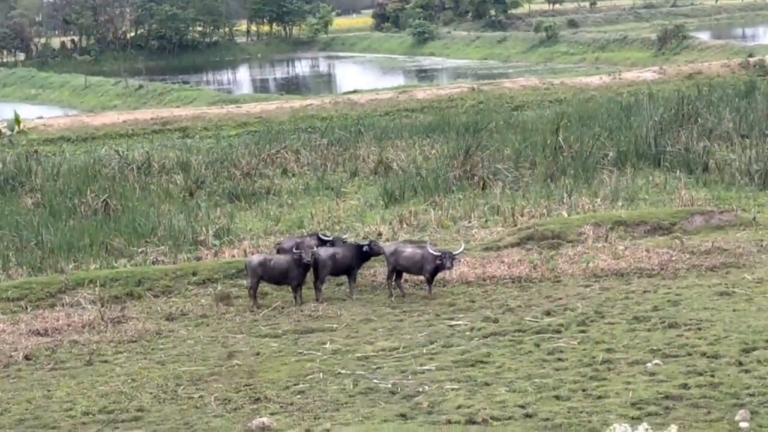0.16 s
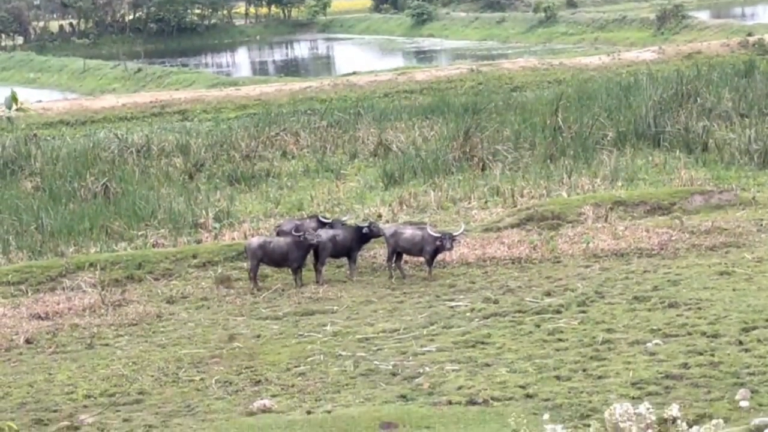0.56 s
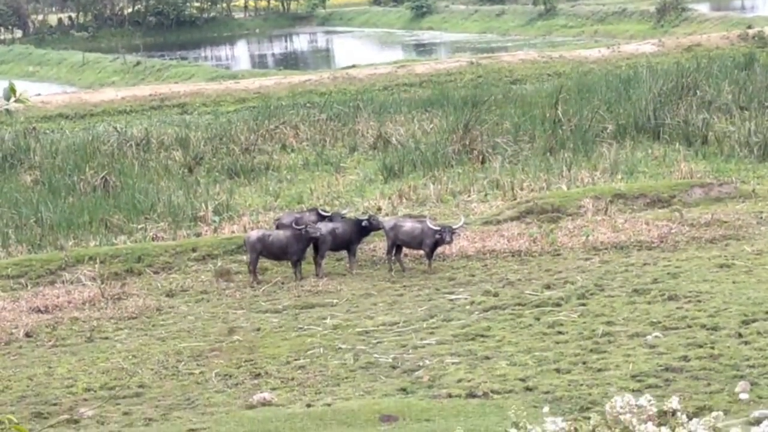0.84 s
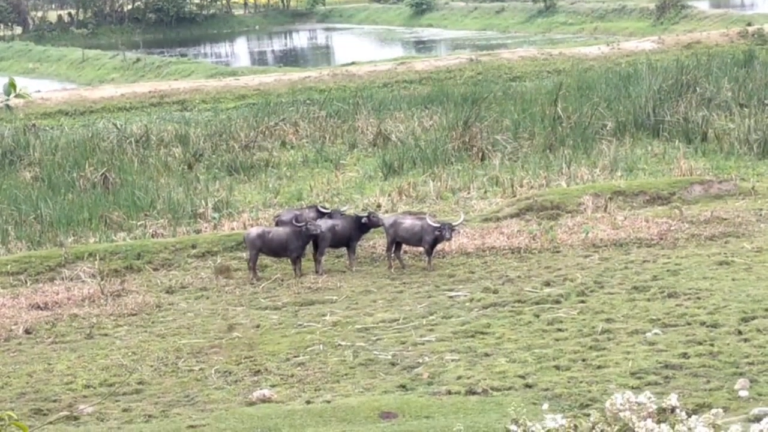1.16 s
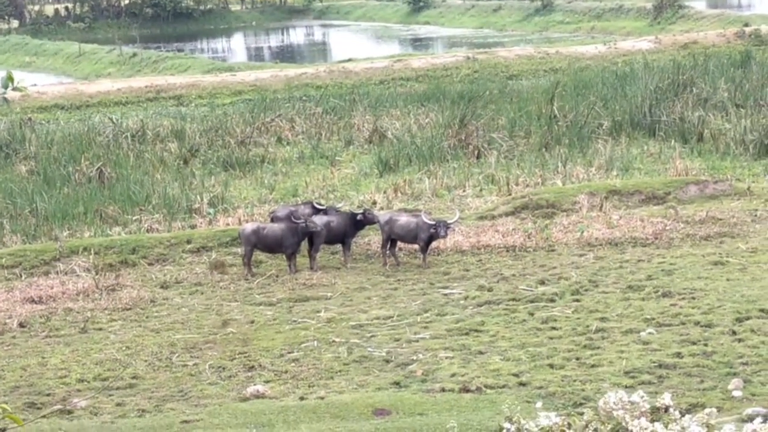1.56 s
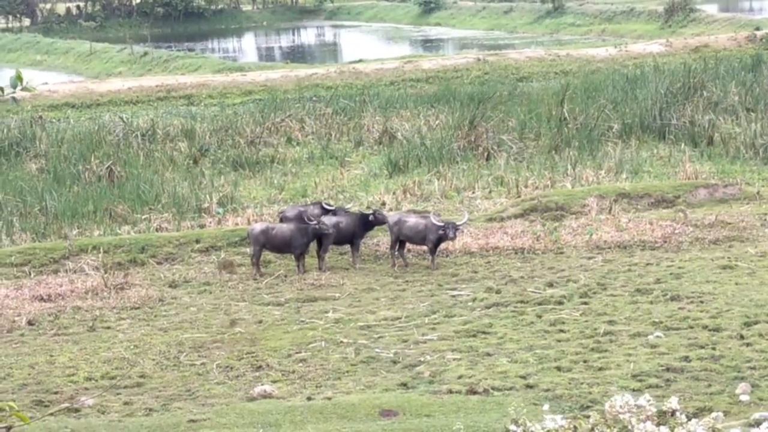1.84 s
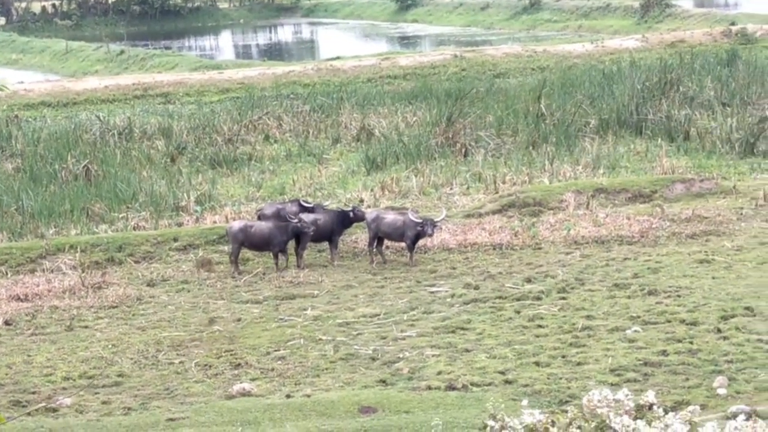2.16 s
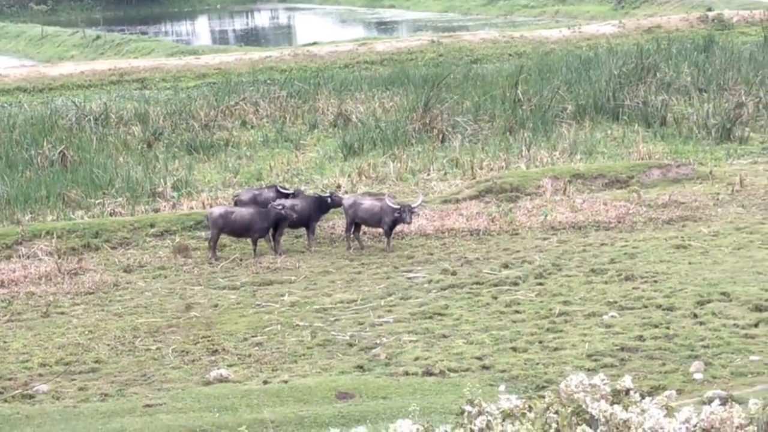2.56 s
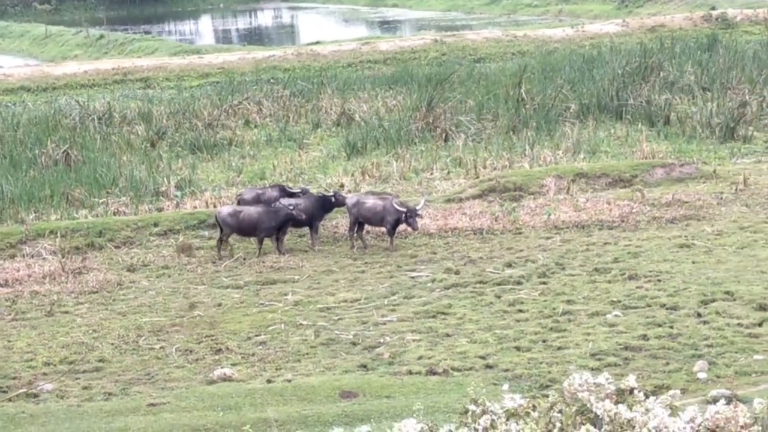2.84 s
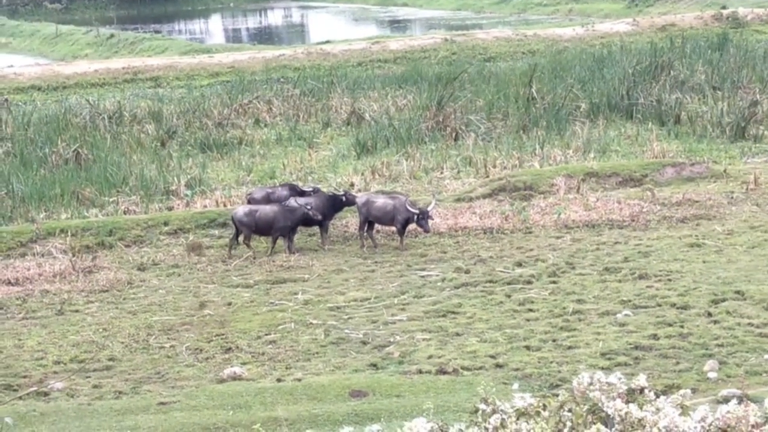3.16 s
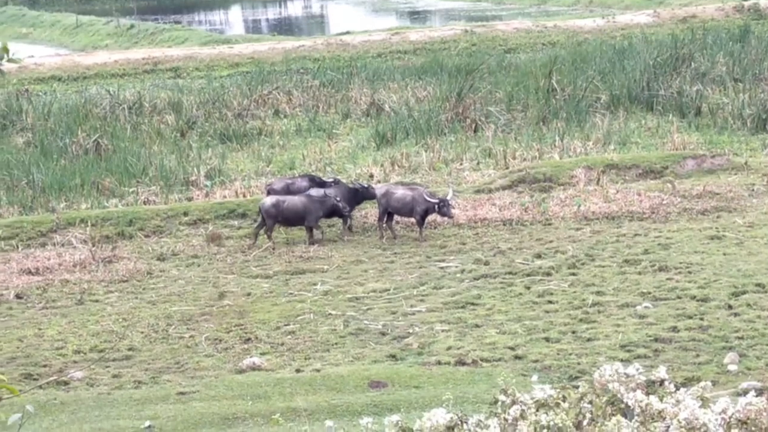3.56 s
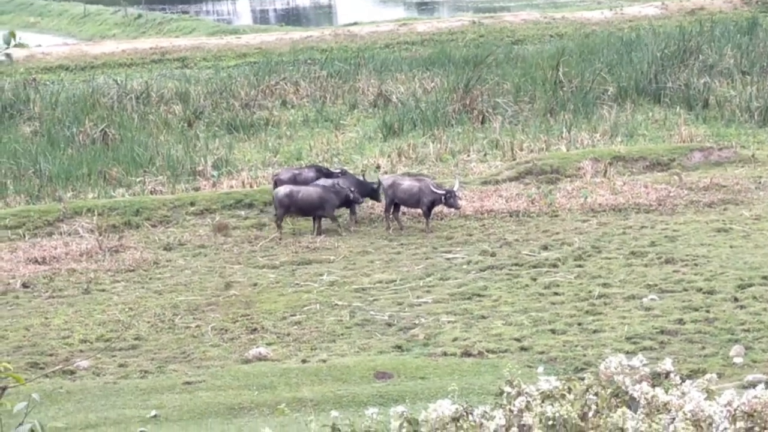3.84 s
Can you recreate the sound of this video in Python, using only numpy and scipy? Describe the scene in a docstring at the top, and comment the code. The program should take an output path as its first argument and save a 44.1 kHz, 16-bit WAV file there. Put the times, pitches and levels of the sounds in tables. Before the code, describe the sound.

One low, rasping buffalo bellow swells upward, drops to a steady softer tone and ends in a creak. Light wind rumbles on the microphone throughout, left with faint outdoor hiss once the call stops.

```python
"""Buffalo lowing in an open field

A buzzy train of vocal-fold pulses rings the throat: the call swells up in pitch, catches once,
holds a steady note and creaks out as the folds flap loosely. The field adds a short reverb.
Wind thumps softly on the microphone; faint ticks, a rustle, thin whistles and hiss lie behind."""
import sys
import numpy as np
from scipy import signal
from scipy.fft import rfft, irfft
from scipy.io import wavfile
from scipy.ndimage import uniform_filter1d

SR = 44100
rng = np.random.default_rng(int(sys.argv[2]) if len(sys.argv) > 2 else 0)


def wav_record(signal):
    """Record a signal, one row per channel, as 16-bit PCM in the file named by sys.argv[1]."""
    frames = np.transpose(np.atleast_2d(signal))
    bounded = np.clip(frames, -1, 1)
    # unit amplitude maps onto the largest positive 16-bit level
    quanta = np.round(bounded * 32767).astype(np.int16)
    wavfile.write(sys.argv[1], SR, quanta)


N = 176400
T = np.arange(N) / SR

# call contour: t/s, pulse rate/Hz, level/dB
CALL_CONTOUR = [(0.0, 68.3, -33), (0.014, 70.27, -38.5), (0.074, 71.68, -37.5), (0.164, 72.14, -38),
                (0.34, 75.4, -35.5), (0.448, 81.34, -32), (0.562, 90.2, -29.5), (0.662, 94.4, -26.5),
                (0.69, 91.9, -28), (0.756, 78.8, -30), (0.804, 73.3, -35), (0.832, 70.6, -38),
                (0.87, 68.72, -38.5), (1.04, 66.95, -43), (1.084, 68.07, -41), (1.67, 68.06, -43.5),
                (1.7, 68.7, -36.5)]
# unbroken pulse runs, the voice catches between them: start/s, end/s
PULSE_RUNS = [(0.0109, .79), (0.808, 1.68)]


def voice():
    """Each fold closure rings the throat; rasp and a rattle of the upper resonance follow it."""
    # gain of the lowest overtones: t/s, level/dB
    bass = [(0, 1), (.2, 1.5), (.45, 2.5), (.66, .5), (.76, 4.5), (.8, 5), (.86, -1), (1.68, 0)]
    # rattle relative to the call: t/s, level/dB
    rattle_levels = [(0, -9), (.2, -3.5), (.4, -8.5), (.66, -13.5), (.71, -0.5), (.85, 0.5), (1, -6),
                     (1.68, -0.5)]
    relaxed_hz, strained_hz, bass_top_hz = 66.6, 92.35, 240
    lead_s, jitter, shimmer_db = .005, .0025, .8
    rasp_db, rasp_s = -16, .005
    rattle_hz, rattle_lag_s, rattle_s = 1656, .0025, .00093
    out, age, hz = np.zeros(N), T[:4096], np.fft.rfftfreq(4096, 1 / SR)
    scatter, breath = iter(rng.standard_normal((200, 5))), rng.standard_normal(N)
    for t, end in PULSE_RUNS:
        while t < end:
            d_level, d_period, d_lag, d_pitch, d_rattle = next(scatter)
            rate_hz = curve(CALL_CONTOUR, t)
            strain = np.clip((rate_hz - relaxed_hz) / (strained_hz - relaxed_hz), 0, 1) ** .6
            db = throat_db(hz, strain, rate_hz / relaxed_hz, rate_hz / strained_hz)
            db += curve(bass, t) / (1 + (hz / bass_top_hz) ** 8)
            pulse = -fold_pulse(db, delay_samples=lead_s * SR + (t - lead_s) * SR % 1)
            # strained folds close again mid-cycle
            half_cycle = int(.5 * SR / rate_hz)
            pulse += .45 * strain ** 2.7 * np.r_[np.zeros(half_cycle), pulse[:-half_cycle]]
            puff = np.roll(breath, -int(t * SR))[:len(age)] * np.exp(-age / rasp_s)
            pulse += undb(rasp_db) * signal.fftconvolve(pulse, puff)[:len(age)] / np.sqrt(rasp_s * SR)
            pulse *= np.sqrt(SR / rate_hz / np.sum(pulse ** 2))  # unit power per cycle
            rattle_age = np.maximum(age - lead_s - rattle_lag_s * (1 + .04 * d_lag), 0)
            rattle = np.sin(2 * np.pi * rattle_hz * (1 + .015 * d_pitch) * rattle_age)
            rattle *= bump(rattle_age, 2 * rattle_s) ** 2
            pulse += rattle * undb(curve(rattle_levels, t) + 2 * d_rattle)
            add(out, t - lead_s, pulse * undb(curve(CALL_CONTOUR, t, column=2) + shimmer_db * d_level))
            t += (1 + jitter * d_period) / curve(CALL_CONTOUR, t + .5 / rate_hz)
    return out


def throat_db(hz, strain, relaxed_pitch_ratio, strained_pitch_ratio):
    """Throat colour: blends from relaxed to strained and slides up with pitch."""
    # throat spectra: f/Hz, relative level/dB
    relaxed = [(40, -30.5), (68, -16), (136, -9), (204, -7.5), (272, 0.5), (340, -9), (408, -22.5),
               (476, -12), (545, -19), (612, 1), (680, -9.5), (750, -1.5), (820, -10.5), (990, -16),
               (1160, -10), (1400, -7.5), (1490, -19.5), (1570, -6), (1700, -5.5), (1850, -14),
               (2150, -16.5), (2300, -30.5), (2450, -42.5), (3500, -55.5), (5000, -75.5)]
    strained = [(40, -32), (93, -10), (186, -6), (279, 4.5), (372, -3.5), (465, -13.5), (558, -7),
                (650, -4.5), (742, -4), (850, -12.5), (1020, -14), (1300, -8), (1480, -4.5), (1640, -16.5),
                (1800, -6.5), (1950, -16), (2250, -29), (2550, -41.5), (3000, -52), (3350, -46.5),
                (3800, -60), (5000, -77)]
    pitch_follow = .49
    return ((1 - strain) * colour_db(relaxed, hz / relaxed_pitch_ratio ** pitch_follow)
            + strain * colour_db(strained, hz / strained_pitch_ratio ** pitch_follow))


def fold_pulse(db, delay_samples, size=4096, opening_hz=850):
    """One pulse of spectrum db: the slow fold opening leads the closure, the throat rings after it."""
    hz = np.fft.rfftfreq(size, 1 / SR)
    cepstrum = irfft(db * np.log(10) / 20, size)
    causal = np.r_[cepstrum[0], 2 * cepstrum[1:size // 2], np.zeros(size // 2)]  # minimum phase
    phase = 2 * np.arctan(hz / opening_hz) - 2 * np.pi * hz * delay_samples / SR
    return irfft(np.exp(rfft(causal) + 1j * phase), size)


def creaks(rise_s=.0015, lower_hz=693):
    """Loose fold flaps ring the upper and lower throat resonances."""
    # flaps: t/s, level/dB, upper f/Hz, lower ring relative level/dB
    flaps = [(0.7978, -35, 1600, -8), (1.6884, -46, 1630, 4), (1.7178, -54.5, 1815, 3),
             (1.733, -60, 1590, -17), (1.7569, -56, 1690, -18), (1.7974, -60, 1474, -17)]
    out, age = np.zeros(N), T[:2000]
    envelope = bump(age, rise_s)
    for t, db, upper_hz, lower_db in flaps:
        upper = envelope ** 2 * np.sin(2 * np.pi * upper_hz * age)
        lower = envelope * np.sin(2 * np.pi * lower_hz * age)
        add(out, t, undb(db) * (upper + undb(lower_db) * lower))
    return out


def airy_hiss(follow=.51, fade_s=.3):
    """Faint hiss that rises and falls with the call, then fades."""
    # spectrum at the call's peak: f/Hz, density/(dB per Hz)
    air_spectrum = [(1500, -125), (2600, -108), (3500, -112), (5000, -118), (7500, -120), (8600, -116),
                    (9600, -120), (11000, -108), (12500, -117), (15000, -117)]
    call_db = curve(CALL_CONTOUR, T, column=2) - np.max(np.array(CALL_CONTOUR)[:, 2])
    gain = undb(follow * call_db + 1.1 * walk(30))
    fade = np.clip((PULSE_RUNS[-1][1] + fade_s - T) / fade_s, 0, 1)
    return noise(air_spectrum) * gain * fade


def field_reverb(call, level_db=-14, t60_s=.24):
    """The field returns the call as a short diffuse tail."""
    age = T[:SR // 2]
    tail = rng.standard_normal(len(age)) * undb(-60 * age / t60_s)
    return undb(level_db) * signal.fftconvolve(call, tail / np.sqrt(np.sum(tail ** 2)))[:N]


def wind(gust_db=2.5, skew=.17):
    """Wind on the microphone: low rumble in uneven, slightly one-sided puffs."""
    # rumble spectrum: f/Hz, relative level/dB
    rumble_spectrum = [(15, -9), (25, 5.5), (80, -4.5), (124, -12), (189, -24), (270, -32), (400, -62),
                       (900, -110)]
    # wind strength: t/s, level/dB
    wind_levels = [(0, -38), (.2, -50), (.8, -55), (1.1, -52), (1.7, -53), (2.1, -57.5), (2.45, -57),
                   (2.62, -49.5), (2.76, -50.5), (2.93, -56.5), (3.03, -46), (3.18, -54), (3.28, -47),
                   (3.5, -58), (3.65, -52), (3.74, -48.5), (3.88, -45), (4, -51.5)]
    rumble = noise(rumble_spectrum) * undb(gust_db * walk(12))
    rumble /= np.sqrt(smooth(rumble ** 2, SR // 5))  # level out slow swings
    return (rumble + skew * (rumble ** 2 - 1)) * undb(curve(wind_levels, T))


def ticks(decay_s=.0015, top_hz=2500):
    """Dull ticks: brief noise bursts through a broad resonance."""
    # ticks: t/s, peak level/dB, centre f/Hz
    bursts = [(2.159, -62, 1604), (2.945, -61.5, 498), (3.567, -59.5, 961), (3.807, -58, 710)]
    out, age = np.zeros(N), T[:1000]
    for t, db, hz in bursts:
        burst = rng.standard_normal(len(age)) * age * np.exp(-age / decay_s)
        tick = signal.lfilter(*signal.butter(3, top_hz, fs=SR), band(burst, hz, 1.6 * hz))
        add(out, t, undb(db) * tick / np.max(np.abs(tick)))
    return out


def rustle(at_s=2.19, spread_s=.037, hz=1730, width_hz=800, level_db=-74.5):
    """One short swell of band noise."""
    grain = unit(band(band(rng.standard_normal(N), hz, width_hz), hz, width_hz))
    return undb(level_db) * grain * np.exp(-((T - at_s) / spread_s) ** 2)


def whistles(waver_db=4, waver_hz=12):
    """Thin distant tones that glide and waver."""
    # notes: start/s, length/s, f/Hz, glide/Hz, level/dB
    notes = [(1.601, 0.19, 2800, 62.5, -75.5), (2.67, .12, 740, -60, -84), (3.279, .08, 903, 3.5, -80),
             (3.556, .14, 310, -12.5, -74), (3.598, 0.07, 1000, 10.5, -80.5),
             (3.657, .05, 800, -7.5, -77.5), (3.766, 0.066, 700, 30, -76)]
    out = np.zeros(N)
    for start_s, length_s, hz, glide_hz, db in notes:
        progress = np.clip((T - start_s) / length_s, 0, 1)
        envelope = undb(db + waver_db * walk(39.97)) * np.sin(np.pi * progress)
        pitch_hz = hz + glide_hz * (progress - .5) + waver_hz * walk(60)
        out += envelope * np.sin(2 * np.pi * np.cumsum(pitch_hz) / SR)
    return out


def background_hiss(drift_db=1.2):
    """Hiss of field and microphone, drifting in level."""
    # noise floor: f/Hz, density/(dB per Hz)
    floor_spectrum = [(150, -102), (300, -105), (400, -110), (550, -112), (720, -108), (950, -111),
                      (1300, -114), (2000, -115), (2700, -118), (3400, -122), (5000, -127), (7500, -130),
                      (11000, -126), (15000, -126)]
    return noise(floor_spectrum) * undb(drift_db * walk(6.5))


def undb(db):
    """dB to gain."""
    return 10 ** (np.asarray(db) / 20)


def colour_db(table, hz):
    """Interpolate a spectrum table over log frequency."""
    table = np.array(table, float)
    return np.interp(np.log(np.maximum(hz, 1)), np.log(table[:, 0]), table[:, 1])


def curve(table, t, column=1):
    """Interpolate one column of a time table."""
    table = np.array(table, float)
    return np.interp(t, table[:, 0], table[:, column])


def bump(age, peak_s):
    """Envelope that rises to 1 at peak_s, then decays."""
    return age / peak_s * np.exp(1 - age / peak_s)


def unit(x):
    """Scale to rms 1."""
    return x / np.sqrt(np.mean(x ** 2))


def noise(spectrum):
    """Noise of the given spectral density."""
    gain = undb(colour_db(spectrum, np.fft.rfftfreq(N, 1 / SR))) * np.sqrt(SR / 2)
    return irfft(rfft(rng.standard_normal(N)) * gain, N)


def band(x, hz, width_hz):
    """One resonance."""
    return signal.lfilter(*signal.iirpeak(hz, hz / width_hz, fs=SR), x)


def smooth(x, samples):
    """Moving average, applied twice."""
    return uniform_filter1d(uniform_filter1d(x, samples), samples)


def walk(rate_hz):
    """Smoothed random steps, rms 1."""
    hold = int(SR / rate_hz)
    return unit(smooth(np.repeat(rng.standard_normal(N // hold + 1), hold), hold)[:N])


def add(out, start_s, x):
    """Mix x in at start_s."""
    i = int(start_s * SR)
    out[i:i + len(x)] += x[:N - i]


def scene():
    """The call and its reverb over wind, hiss and small sounds; mono."""
    call = voice() + creaks()
    call += band(call, hz=684, width_hz=13)  # nasal ring
    reverb = field_reverb(call)
    hiss = background_hiss()
    return (call + reverb + airy_hiss() + wind() + ticks() + rustle() + whistles() + hiss)[None]


def record(dry):
    """Steep low-pass at 15.74 kHz."""
    return signal.sosfilt(signal.ellip(10, .2, 70, 15740, fs=SR, output="sos"), dry)


dry = scene()
out = record(dry)
wav_record(out)
```